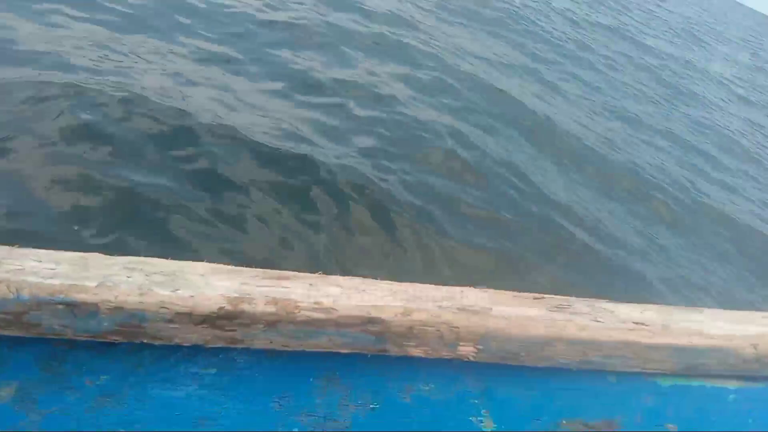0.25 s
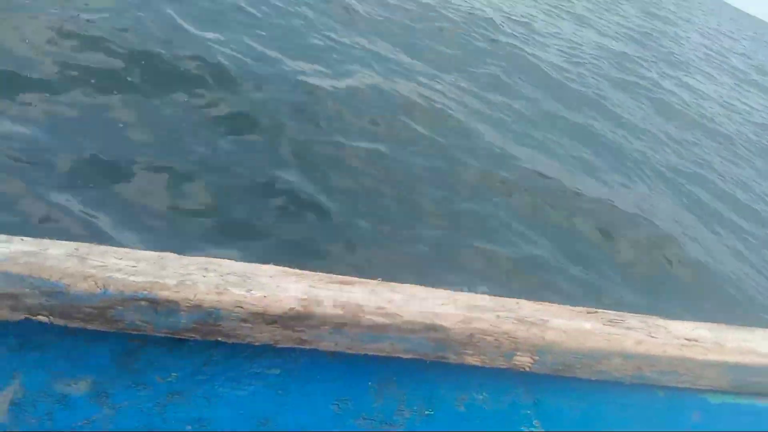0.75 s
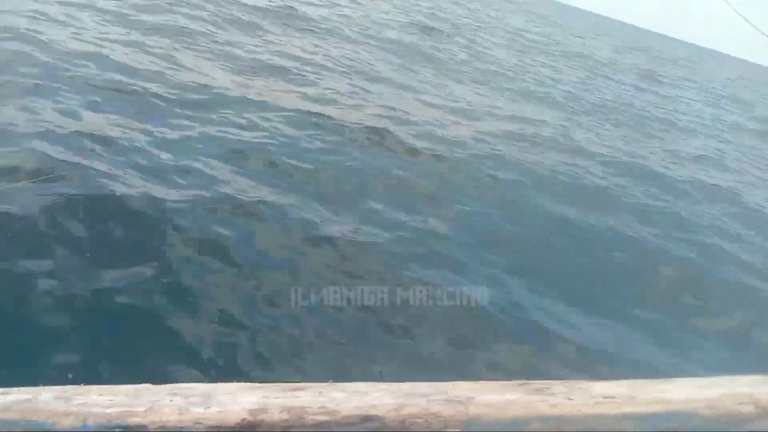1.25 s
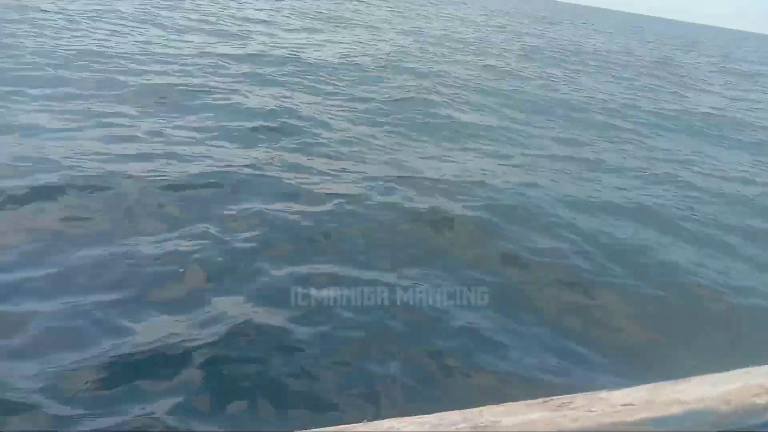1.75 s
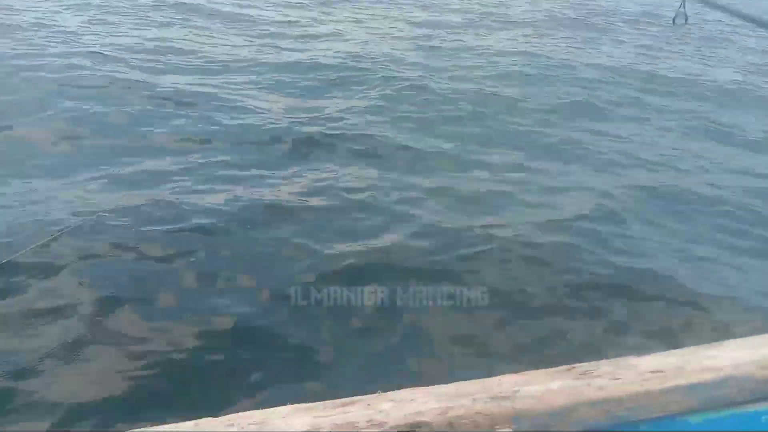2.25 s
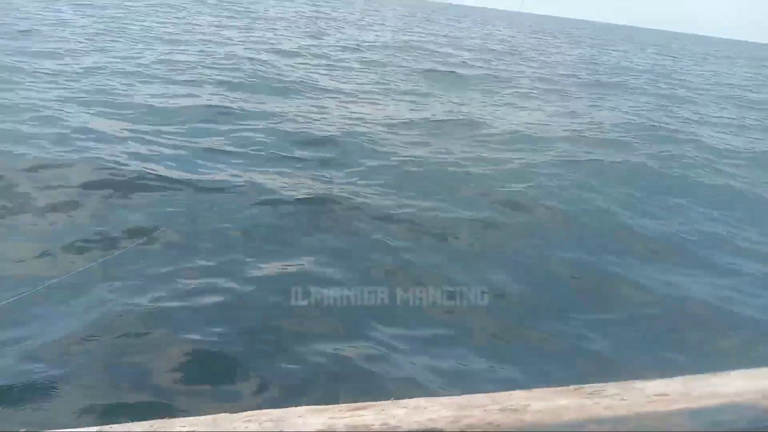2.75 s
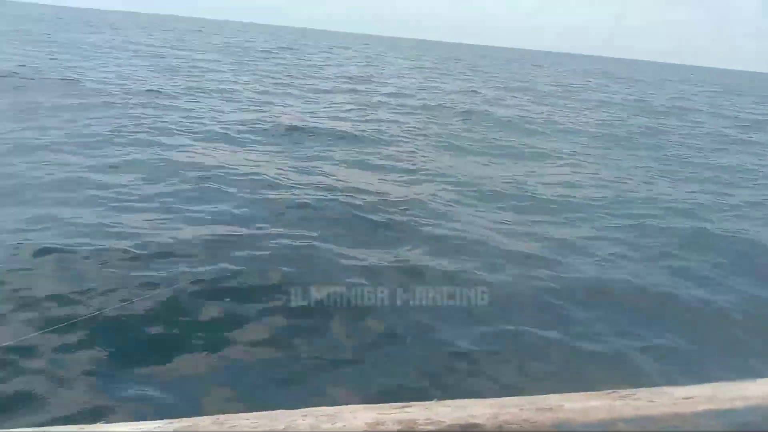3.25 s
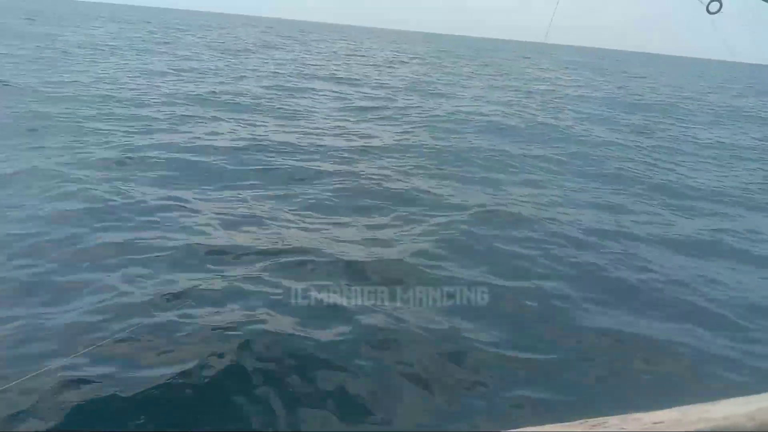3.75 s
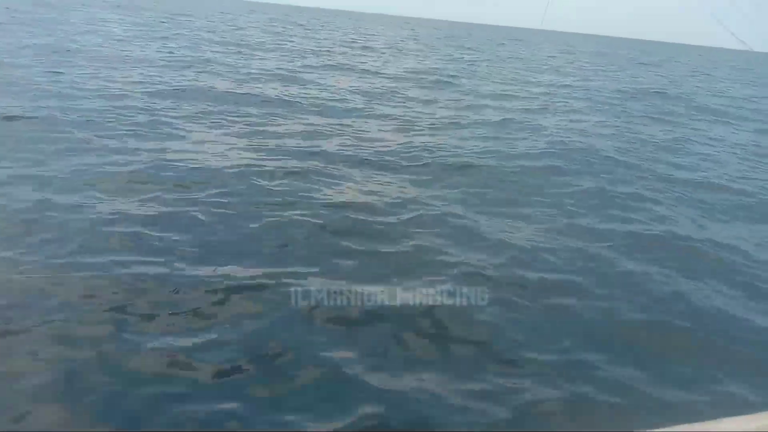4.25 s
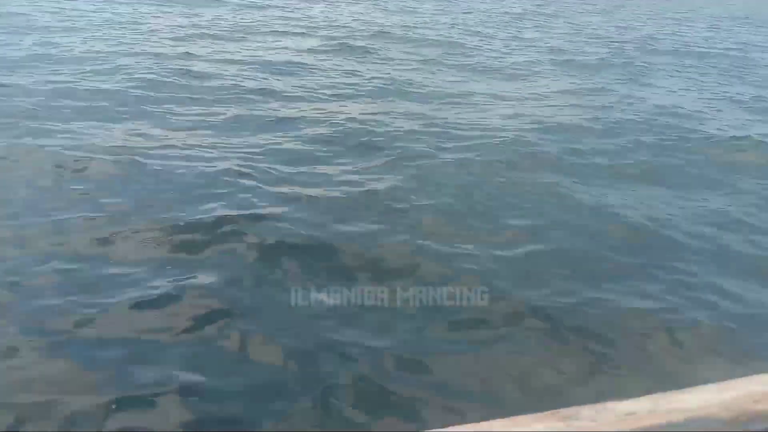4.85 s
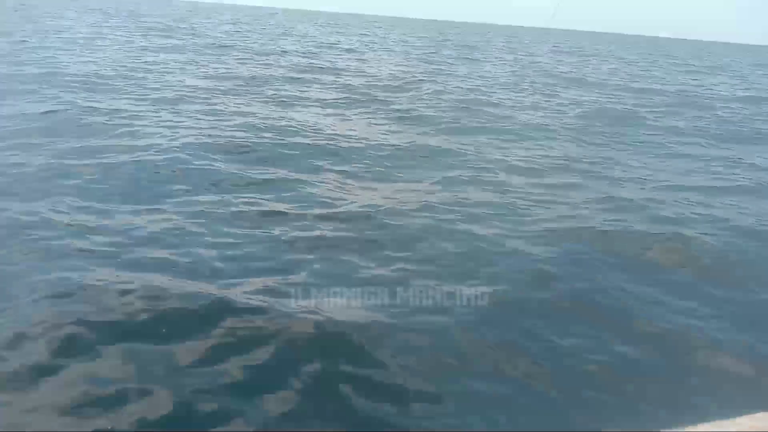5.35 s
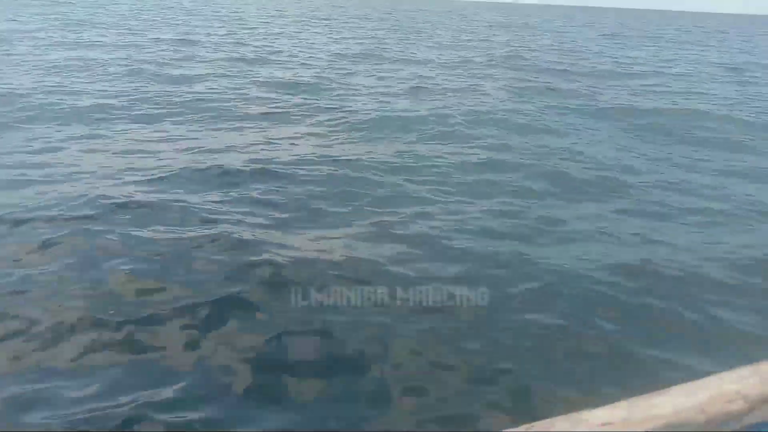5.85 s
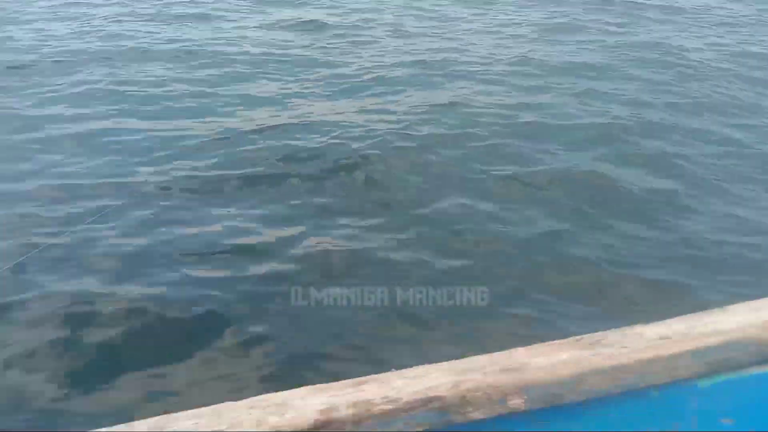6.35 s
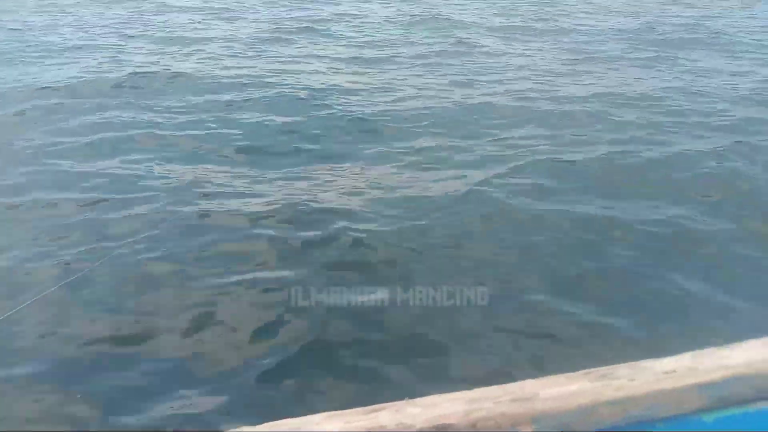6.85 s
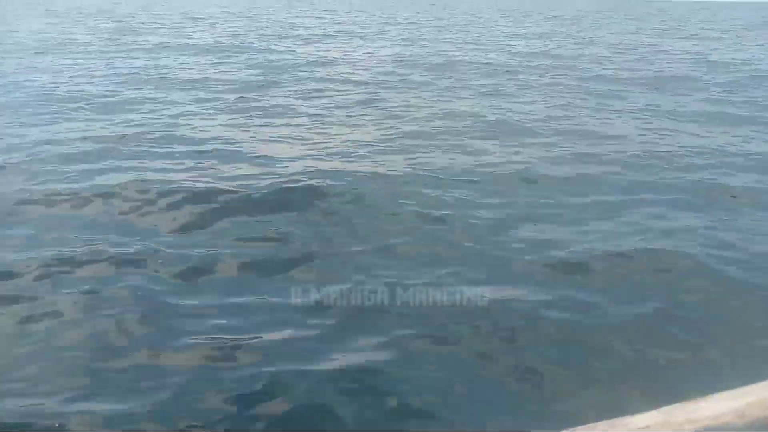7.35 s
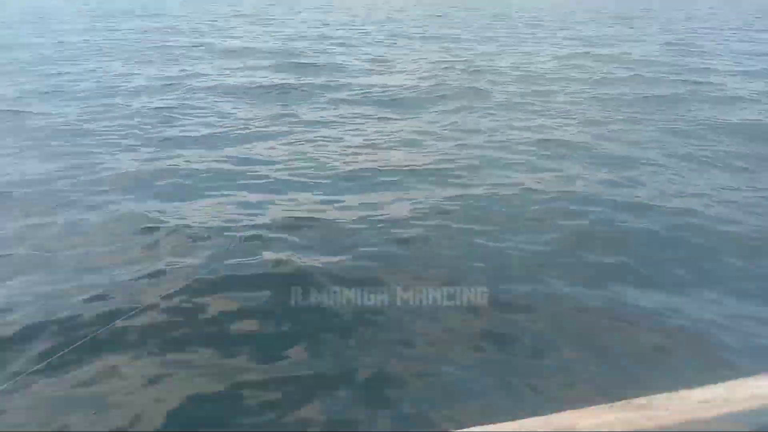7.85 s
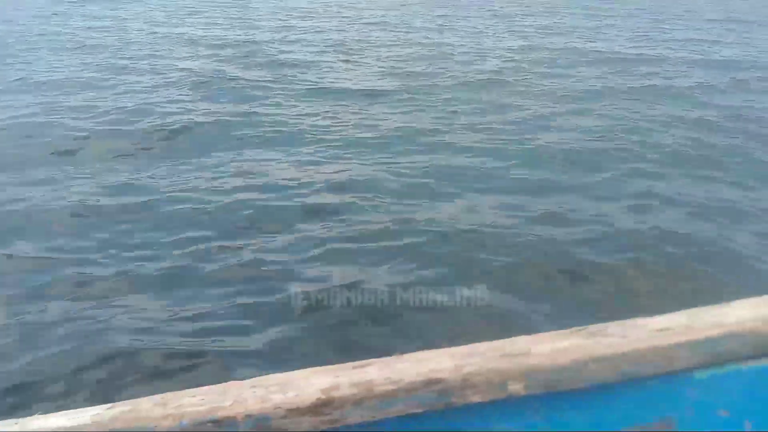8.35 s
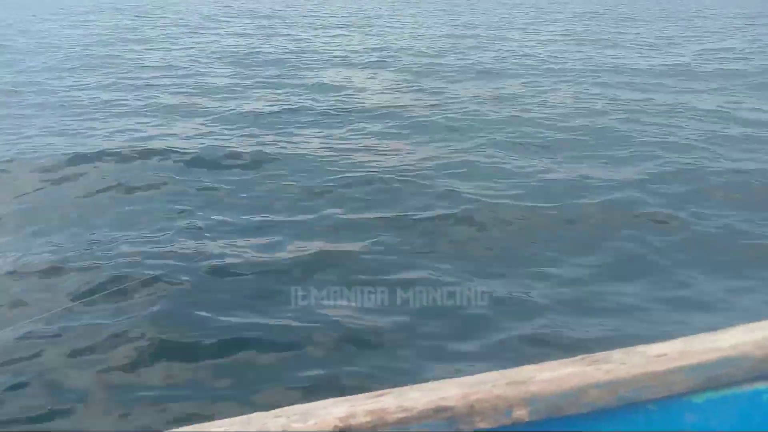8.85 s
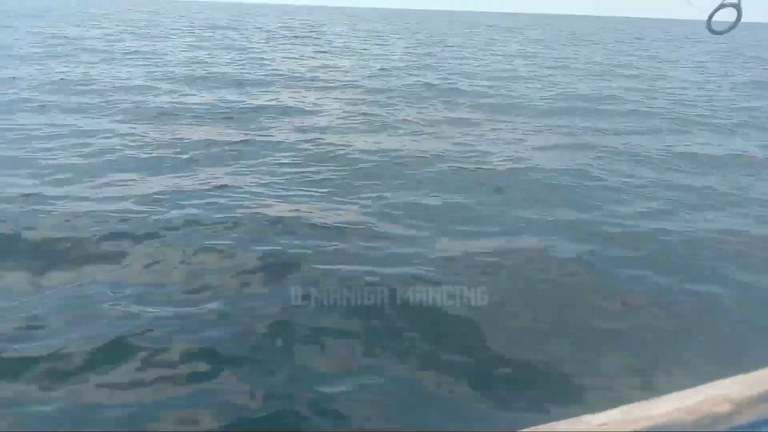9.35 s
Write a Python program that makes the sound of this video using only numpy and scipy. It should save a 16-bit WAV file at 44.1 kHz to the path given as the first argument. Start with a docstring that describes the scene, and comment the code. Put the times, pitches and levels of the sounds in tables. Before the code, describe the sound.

Light swell works against a wooden hull. Breeze hisses in uneven puffs through hollow microphone resonances, with soft low buffets and fine droplet crackle. Deep air-pocket glugs and booming wavelets are busiest in the first two seconds, followed by a brief bright splash. Then scattered wet plank slaps, gurgles and dry clicks of loose gear continue, the strongest wet slaps around six and a half seconds. Open air, close and dry.

```python
"""A small wooden boat lies on a light swell in open water. From the start a breeze hisses through the
resonances of the microphone housing and buffets it, spray crackles, and wavelets gurgle along the side.
Trapped pockets of air soon glug, water slaps the planks and loose gear ticks against the boat. After about
two seconds a short splash patters down; then glugs, slaps and ticks go on, scattered, over the water
and the breeze. Noise, clicks through resonances and fading tones make all of these sounds."""
import sys
import numpy as np
from scipy import signal
from scipy.fft import rfft, irfft, next_fast_len
from scipy.io import wavfile

SR = 44100
rng = np.random.default_rng(int(sys.argv[2]) if len(sys.argv) > 2 else 0)


def transcribe(u):
    """Save the signal u as a 16-bit wav file named by the first command-line argument.

    u: samples, shape (n,) or (channels, n), limited to [-1, 1]; the rate is SR.
    q: integer samples, one column per channel.
    """
    v = np.clip(np.atleast_2d(u).T, -1, 1)
    q = np.round(v * 32767).astype(np.int16)
    wavfile.write(sys.argv[1], SR, q)


N = 424241
TIME = np.arange(N) / SR   # seconds


def from_db(db):
    """Turn decibels into a gain."""
    return 10 ** (np.asarray(db) / 20)


def rms_one(x):
    """Scale a sound to unit power."""
    return x / np.sqrt(np.mean(x ** 2) + 1e-20)


def add(out, start, sound, peak_db):
    """Mix a sound in at a time in seconds, with the given peak."""
    at = max(0, round(start * SR))
    scaled = from_db(peak_db) * sound / np.abs(sound).max()
    out[at:at + len(sound)] += scaled[:N - at]


def drift(rate):
    """Smooth random wandering with a spread of 1; a higher rate wanders faster."""
    # worked out at every 20th sample, then joined by straight lines
    r = np.exp(-40 * np.pi * rate / SR)
    noise = rng.standard_normal(N // 20 + 2002)
    slow = signal.lfilter([1], [1, -2 * r, r * r], noise)[2000:]
    return np.interp(np.arange(N) / 20, np.arange(len(slow)), rms_one(slow))


def cut(x, hz, kind, order=2):
    """Butterworth filter: keep what lies below ("low") or above ("high") a frequency."""
    safe_hz = np.clip(hz, 10, .45 * SR)
    return signal.sosfilt(signal.butter(order, safe_hz, kind, fs=SR, output="sos"), x)


def resonate(x, hz, width):
    """Pass a sound through one resonance, with unit gain at its top."""
    r = np.exp(-np.pi * width / SR)
    feed = np.array([1, 0, -1]) * (1 - r * r) / 2
    return signal.lfilter(feed, [1, -2 * r * np.cos(2 * np.pi * hz / SR), r * r], x + 1e-18)


def colour(x, points):
    """Give a steady sound a spectrum, at unit power."""
    size = next_fast_len(N)
    hz, db = np.transpose(points)
    log_hz = np.log(np.arange(size // 2 + 1) * SR / size + 1)
    gain = from_db(np.interp(log_hz, np.log(hz), db))
    return rms_one(irfft(rfft(x, size) * gain, size)[:N])


def grains(per_s, spread_db):
    """Clicks at random moments, many small and a few large."""
    sizes = from_db(spread_db * np.minimum(rng.exponential(1, N), 4))
    return sizes * rng.choice([-1, 1], N) * (rng.random(N) < per_s / SR)


def swells(rows, rise_s, fall_s):
    """Gain that rises, holds and dies away for each (start, hold, level) row; the powers add."""
    # rise_s and fall_s are the times for a change of 20 dB
    t = TIME[::40]
    power = 0
    for start, hold, db in rows:
        before = np.maximum(start - t, 0) / rise_s
        after = np.maximum(t - start - hold, 0) / fall_s
        power = power + from_db(db - 20 * (before + after)) ** 2
    return np.interp(TIME, t, np.sqrt(power))


def far_sea():
    """The even, dull wash of the open water: noise kept between two filters."""
    dull = cut(rng.standard_normal(N), 1800, "low")
    return from_db(-88) * rms_one(cut(dull, 500, "high"))


# strength of the steady breeze, before each layer's own gain: (time [s], level [dB])
WIND_STRENGTH = [(0.0, -58.5), (0.45, -65), (0.8, -60), (1.1, -65), (1.4, -58), (1.97, -67.5),
                 (2.08, -82.5), (2.85, -73), (3.15, -65.5), (4.0, -68), (4.42, -71), (5.1, -71),
                 (5.55, -60.5), (6.25, -72), (6.6, -63), (7.6, -66.5), (7.85, -72), (8.5, -69.5),
                 (9.62, -75)]


def wind():
    """Gain of the steady breeze, which drives the hiss, the spray and a faint rumble."""
    return from_db(np.interp(TIME, *np.transpose(WIND_STRENGTH)))


# resonances of the microphone housing: (pitch [Hz], width [Hz], level [dB])
HOUSING_MODES = [(809, 49, -15.5), (1254.8, 26.1, 2.5), (1658, 150, -13.5), (1885, 200, -19.5),
                 (2572, 59, -4), (3010, 84, -8.5), (3296, 68, -8), (3824, 95, -16), (4264, 97, -19),
                 (4710, 170, -26), (5267, 42, -14), (5330, 310, -20), (5300, 65, -37), (6720, 82, -27),
                 (7120, 270, -23.5), (8730, 59, -25)]


def housing(x, flicker_db):
    """Hollow resonances, each swelling and fading as the flow shifts."""
    total = 0
    for k, (hz, width, db) in enumerate(HOUSING_MODES):
        strength = from_db(db + flicker_db * drift(15.4))
        total = total + (-1) ** k * resonate(x, hz, width) * strength
    return rms_one(total)


# puffs that lift the hiss and throw droplets, before each layer's own gain:
# (start [s], hold [s], hiss level [dB], spray level [dB])
WIND_PUFFS = [(0.034, 0.11, -75, -68), (0.626, 0.049, -60, -76), (0.804, 0.092, -67, -66),
              (1.24, 0.083, -57, -78), (1.33, 0.1, -52.5, -72), (1.837, 0.03, -67, -61.5),
              (2.338, 0.29, -58.5, -71), (3.196, 0.09, -64, -68), (3.51, 0.14, -59, -68.5),
              (3.727, 0.024, -65, -79), (4.512, 0.092, -63, -75), (4.903, 0.017, -54, -66.5),
              (5.44, 0.059, -59.5, -90), (5.61, 0.07, -61.5, -76), (5.96, 0.15, -62, -77),
              (6.398, 0.19, -61, -70.5), (6.867, 0.083, -59.5, -76), (6.988, 0.091, -61.5, -89),
              (7.416, 0.057, -65, -70), (7.5, 0.23, -65, -88), (8.132, 0.045, -64.5, -71),
              (8.28, 0.048, -59, -70), (8.932, 0.14, -63, -70), (9.168, 0.027, -58.5, -66.5)]
PUFF_RISE_S, PUFF_FALL_S = 0.068, 0.1   # time to swell or fade by 20 dB


def breeze_hiss():
    """A grainy rush of air makes the housing resonances hiss."""
    rows = [(start, hold, hiss_db) for start, hold, hiss_db, _ in WIND_PUFFS]
    level = np.hypot(wind(), swells(rows, PUFF_RISE_S, PUFF_FALL_S))
    return from_db(-0.94) * level * housing(grains(12000, spread_db=2.5), flicker_db=5.0)


# eddies that buffet the microphone, before the layer's gain: (start [s], hold [s], level [dB])
WIND_EDDIES = [(0.07, 0.067, -34.5), (0.14, 0.23, -45.5), (0.53, 0.036, -47), (1.15, 0.48, -73.5),
               (1.61, 0.12, -49), (1.85, 0.024, -52), (2.06, 0.26, -67), (2.25, 0.04, -56.5),
               (2.42, 0.2, -67), (3.0, 0.027, -67), (3.33, 0.026, -62), (3.49, 0.11, -57),
               (3.84, 0.01, -70), (4.55, 0.11, -73), (4.75, 0.018, -57.5), (4.87, 0.073, -63.5),
               (5.64, 0.036, -71), (6.49, 0.061, -54.5), (6.66, 0.023, -57.5), (7.05, 0.074, -60),
               (7.39, 0.068, -57.5), (7.54, 0.14, -63), (8.755, 0.0057, -58.5), (8.835, 0.011, -59.5),
               (8.96, 0.028, -60), (9.18, 0.046, -71)]
# spectrum of the buffeting: (frequency [Hz], level [dB per Hz])
BUFFET_SPECTRUM = [(20, -20.5), (40, -27), (60, 1), (105, 0.5), (160, -8), (240, -21), (400, -31.5),
                   (800, -64.5)]


def breeze_buffeting(rumble_db=-16.5):
    """Eddies push on the microphone in low lumps of noise, over a faint steady rumble."""
    # the rumble level is relative to the breeze
    level = np.hypot(from_db(rumble_db) * wind(), swells(WIND_EDDIES, rise_s=0.014, fall_s=0.063))
    low_noise = cut(colour(rng.standard_normal(N), BUFFET_SPECTRUM), 700, "low")
    return from_db(2.0) * level * low_noise


def droplets(per_s, spread_db, width_hz, count=28):
    """Tiny bubbles burst, each ringing briefly at one of many pitches."""
    pitches = np.linspace(1500, 15300, count)
    return sum(resonate(grains(per_s / count, spread_db), hz, width_hz) for hz in pitches)


# spectrum of the spray: (frequency [Hz], level [dB per Hz])
SPRAY_SPECTRUM = [(700, -14.5), (1800, -2), (4000, -2.5), (6000, 1), (6400, -12.5), (7200, 0.5),
                  (8000, -16.5), (9000, -8.5), (11000, -4), (13800, -15), (15200, -5.5)]


def spray(steady_db=-11):
    """Droplets crackle in quick flurries over a faint even fizz."""
    rows = [(start, hold, spray_db) for start, hold, _, spray_db in WIND_PUFFS]
    thrown = swells(rows, PUFF_RISE_S, PUFF_FALL_S)
    level = np.hypot(from_db(steady_db) * wind(), thrown)   # steady_db is relative to the breeze
    flurries = from_db(5.55 * drift(30))
    crackle = rms_one(droplets(4500, spread_db=2.5, width_hz=1094)) * flurries
    fizz = from_db(-10) * rng.standard_normal(N)
    return from_db(-3.0) * level * colour(crackle + fizz, SPRAY_SPECTRUM)


# waves that work along the hull, before each layer's own gain: (start [s], hold [s], level [dB])
HULL_WAVES = [(0.12, 0.44, -64.5), (0.54, 0.13, -54), (1.2, 0.21, -65), (1.72, 0.26, -66.5),
              (2.35, 0.27, -62.5), (3.2, 0.13, -66), (3.5, 0.14, -76), (4.88, 0.1, -75),
              (5.34, 0.48, -72.5), (6.38, 0.12, -59), (6.62, 0.066, -67), (6.92, 0.066, -76),
              (7.42, 0.17, -81), (7.93, 0.15, -72.5), (8.29, 0.043, -68.5), (9.12, 0.18, -72),
              (9.42, 0.033, -72.5)]


def lap_level(calm_db=-83.5):
    """Gain of the water working along the hull; calm_db remains between waves."""
    return np.hypot(from_db(calm_db), swells(HULL_WAVES, rise_s=0.15, fall_s=0.1))


# wavelets rolling along the side: (start [s], end [s], level [dB], bubble pitch [Hz])
WAVELETS = [(0.628, 0.693, -48.5, 302), (0.794, 0.81, -51, 400), (0.891, 0.921, -57, 300),
            (1.123, 1.249, -53.5, 331), (1.28, 1.404, -54, 545), (1.497, 1.509, -50, 296),
            (1.814, 1.88, -54.5, 300), (4.507, 4.641, -53.5, 326), (5.437, 5.455, -51, 550),
            (5.631, 5.685, -44.5, 400), (6.363, 6.48, -62.5, 272), (7.906, 7.987, -69.5, 302),
            (8.902, 8.949, -54, 554), (9.111, 9.154, -53.5, 447)]
# resonances of the hollow under the side of the boat: (pitch [Hz], width [Hz], level [dB])
HOLLOW_MODES = [(164, 21, -3.5), (270, 22, -1), (443.3, 33, 3)]


def lapping(edge_s=0.016, fall_db=11.5, open_db=-8, top_hz=620, sharpness=17.2):
    """Crowds of large bubbles gurgle along the hull; each passing wavelet makes the hollow boom."""
    pitches = np.geomspace(140, 900, 16)
    bubbles = np.array([rms_one(resonate(grains(110, spread_db=5.5), hz, hz / sharpness))
                        for hz in pitches])
    gurgle = from_db(-5.5 * np.log2(pitches / 420) ** 2) @ bubbles
    out = from_db(-1.0) * lap_level() * rms_one(cut(gurgle, 1100, "low", order=4))
    for start, end, db, centre_hz in WAVELETS:
        here = slice(round((start - .05) * SR), round((end + .05) * SR))
        # bubbles one octave from the centre pitch are weaker by fall_db
        crowd = from_db(-fall_db * np.log2(pitches / centre_hz) ** 2) @ bubbles[:, here]
        boom = from_db(open_db) * crowd   # the part heard directly
        for hz, width, mode_db in HOLLOW_MODES:
            boom = boom + from_db(mode_db) * resonate(crowd, hz, width)
        corners = [start - edge_s, start + edge_s, end - edge_s, end + 2 * edge_s]
        swell = np.interp(TIME[here], corners, [0, 1, 1, 0])
        out[here] += from_db(db) * swell * rms_one(cut(boom, top_hz, "low", order=6))
    return out


def froth(centre_hz=1340, fall_db=5, sharpness=28.0):
    """Smaller bubbles burst in the froth of each wave, higher in pitch than its gurgle."""
    bubbles = 0
    for hz in np.geomspace(700, 2300, 12):
        gain = from_db(-fall_db * np.log2(hz / centre_hz) ** 2)   # fall_db is lost one octave away
        bubbles = bubbles + gain * resonate(grains(45, spread_db=3.0), hz, hz / sharpness)
    return from_db(-12.5) * lap_level() * rms_one(cut(bubbles, 600, "high"))


# air pockets squeezed under the hull:
# (time [s], peak level [dB], first pitch [Hz], last pitch [Hz], swell time [s])
AIR_POCKETS = [(0.0811, -16.5, 373, 120, 0.0073), (0.158, -27, 140, 161, 0.0056),
               (0.519, -29.5, 145, 113, 0.0051), (0.672, -37, 320, 275, 0.0041),
               (1.355, -41.5, 466, 430, 0.0062), (1.515, -41.5, 119, 86, 0.012),
               (1.844, -43.5, 187, 137, 0.02), (3.508, -36, 126, 104.6, 0.0073),
               (4.525, -62, 505, 292, 0.0069), (4.611, -45.5, 192, 162, 0.013),
               (5.454, -33.5, 130, 129, 0.024), (8.898, -39.5, 558, 526, 0.0061),
               (8.929, -42.5, 540, 470, 0.0039), (9.102, -47, 494, 442, 0.0063),
               (9.118, -39.5, 238, 217, 0.027), (9.285, -56, 450, 400, 0.013)]


def glugs(rough=0.18, waver=0.048, sharpness=1.6, glide=1.1):
    """A trapped pocket swells and rings; its pitch slides, nearly always down, as water closes over it."""
    out, t = np.zeros(N), TIME[:SR // 4]
    wobble, churn = drift(61), drift(120)
    for start, db, first_hz, last_hz, swell_s in AIR_POCKETS:
        here = slice(round(start * SR), round(start * SR) + len(t))
        age = t / swell_s   # glide is counted in swell times too
        slide = np.exp(-(age / glide) ** 2)
        hz = (last_hz + (first_hz - last_hz) * slide) * (1 + waver * wobble[here])
        envelope = (age * np.exp(1 - age)) ** sharpness * (1 + rough * churn[here])
        add(out, start, envelope * np.sin(2 * np.pi * np.cumsum(hz) / SR), db)
    return out


# ringing modes of the planks; damping shortens the fade:
# (pitch [Hz], level [dB], time to fade by 60 dB before damping [s])
PLANK_MODES = [(98, -7, 0.13), (302, -8, 0.13), (400, -8.5, 0.13), (716, -8, 0.066), (891, -11.5, 0.15),
               (971, -23, 0.18), (1090, -23, 0.14), (1269, -6.5, 0.11), (1531, -5, 0.02),
               (1973, -2.5, 0.013), (2302, -12, 0.097), (3090, -13.5, 0.027), (4120, -5, 0.013)]
# slaps on the planks; the crack level is taken before the final mix:
# (time [s], peak level [dB], pitch of the smack [Hz], top edge [Hz], wet crack level [dB])
WATER_SLAPS = [(0.3536, -43, 3340, 4400, -1), (0.369, -43, 1400, 2240, -26),
               (0.5135, -26.5, 1690, 4330, -4.5), (2.353, -30, 2230, 12000, 7.5),
               (2.481, -39.5, 1340, 4000, -22), (3.481, -51.5, 2640, 6000, -3),
               (4.905, -52, 745, 1510, -22), (5.4197, -41, 1110, 3020, -6), (5.45, -31.5, 730, 2520, 4),
               (6.486, -30, 4300, 11600, 13.5), (6.4893, -32, 1380, 7140, 2.5), (6.529, -35, 1950, 6100, 4),
               (6.535, -32.5, 1640, 6300, 10.5), (6.6368, -30, 1400, 1800, -8),
               (9.166, -44.5, 1500, 4500, -11)]


def slaps(travel_s=0.0014, patter_s=0.0051, patter=0.12, crack_s=0.062, detune=0.03,
          smack=0.675, wet_damping=0.72, pop=1.45, pop_cycles=2.1):
    """A sheet of water hits the planks; bending waves bring the treble first and the bass later."""
    out, t = np.zeros(N), TIME[:SR // 4]
    for start, db, smack_hz, top_hz, crack_db in WATER_SLAPS:
        body = 0
        damping = 0.67 + wet_damping * from_db(crack_db)   # a wetter blow deadens the planks
        chances = rng.standard_normal((len(PLANK_MODES), 2))
        for (hz, mode_db, fade_s), (strength, load) in zip(PLANK_MODES, chances):
            age = np.maximum(t - travel_s * (np.sqrt(4500 / hz) - 1), 0)
            envelope = from_db(mode_db + 1.27 * strength - 60 * damping * age / fade_s)
            # the water pressing on the planks shifts their modes a little at every blow
            body = body + envelope * np.sin(2 * np.pi * hz * (1 + detune * load) * age)
        # one sharp push, then a noisy patter that dies away
        push = (t == 0) + patter * rng.standard_normal(len(t)) * np.exp(-t / patter_s)
        knock = signal.fftconvolve(body, push)[:len(t)]
        # air caught between water and wood gives each smack its own pitch
        air = rms_one(resonate(knock, smack_hz, 0.12 * smack_hz))
        knock = knock + smack * knock.std() * air
        crack_fade = from_db(crack_db - 60 * damping * t / crack_s)
        crack = cut(rng.standard_normal(len(t)), 1150, "high") * crack_fade
        # the first contact pops at once, before the planks answer
        contact = pop * np.sin(2 * np.pi * smack_hz * t) * np.exp(-smack_hz * t / pop_cycles)
        blow = knock / np.abs(knock).max() + contact + .5 * crack
        add(out, start, cut(blow, top_hz, "low", order=4), db)
    return out


# gear ticking against the boat: (time [s], peak level [dB], centre pitch [Hz])
GEAR_TICKS = [(0.543, -45, 12200), (2.408, -33.5, 7500), (2.4339, -34, 5270), (3.2249, -44, 6200),
              (4.121, -47.5, 6680), (4.3084, -51.5, 6600), (4.5132, -40, 5280), (4.721, -54.5, 3830),
              (4.903, -31.5, 5070), (5.606, -28.5, 5070), (5.695, -39, 5540), (5.8712, -37, 5400),
              (5.963, -45.5, 5250), (6.3607, -41, 5600), (6.8823, -45, 7040), (6.8954, -32, 6100),
              (7.3906, -47.5, 6300), (8.294, -39.5, 5300), (8.3, -41.5, 5370), (8.6642, -47, 4720),
              (8.9957, -45.5, 9200), (9.4793, -48, 4850)]


def ticks(snap_s=0.00077, ring_s=0.0052, ring_db=-12, bounce_s=0.0017, bounce_db=-8,
          brush_s=0.0037, brush_db=-25):
    """Small hard contacts: noise bursts form a light brush, a snap, a quick rebound and a short ring."""
    out, t = np.zeros(N), TIME[:SR // 20] - .01   # the brush comes just before time zero
    for contact_s, db, hz in GEAR_TICKS:
        first, second, tail = rng.standard_normal((3, len(t)))
        snap = first * (t > 0) * np.exp(-np.abs(t) / snap_s)
        rebound_fade = (t > bounce_s) * np.exp(-np.abs(t - bounce_s) / snap_s)
        rebound = from_db(bounce_db) * second * rebound_fade
        ring_fade = from_db(ring_db) * np.exp(-t / ring_s)
        brush_rise = from_db(brush_db) * np.exp(t / brush_s)
        brush_and_ring = tail * np.where(t > 0, ring_fade, brush_rise)
        tick = resonate(snap + rebound + brush_and_ring, hz, 1.07 * hz)
        tick = cut(cut(tick, 3100, "high"), 1.21 * hz, "low")
        add(out, contact_s + t[0], tick, db)
    return out


# surges of the splash, before each part's own gain: (start [s], hold [s], level [dB])
SPLASH_SURGES = [(2.315, 0.057, -37), (2.392, 0.058, -38), (2.476, 0.02, -38.5), (2.558, 0.06, -43.5)]
# spectrum of the spatter: (frequency [Hz], level [dB per Hz])
SPATTER_SPECTRUM = [(300, -20), (750, 17), (1020, -18), (1650, 7), (2200, -5.5), (4200, -6.5), (7200, -8.5),
                    (8200, -16.5), (12000, -13.5), (14000, -30), (15300, -13)]
# a thin squirt within the splash: (time [s], pitch [Hz])
SQUIRT_PITCH = [(2.317, 2600), (2.352, 3063), (2.378, 2450), (2.395, 3270), (2.43, 3270), (2.448, 2555),
                (2.5, 2960)]


def splash():
    """Thrown water patters down close by; a thin squirt wanders in pitch and the housing rings along."""
    level = swells(SPLASH_SURGES, rise_s=0.004, fall_s=0.033)
    spatter = colour(droplets(4000, spread_db=1.0, width_hz=620), SPATTER_SPECTRUM)
    spatter = from_db(-14) * cut(spatter, 230, "high")
    pitch = np.interp(TIME, *np.transpose(SQUIRT_PITCH))
    squirt = rms_one(drift(190) * np.sin(2 * np.pi * np.cumsum(pitch) / SR))
    # the squirt stands out most while the flow is at its strongest
    squirt = from_db(-11.5) * squirt * level / level.max()
    ringing = from_db(-14) * housing(grains(4000, spread_db=8.5), flicker_db=1.0)
    return level * (spatter + squirt + ringing)


def scene():
    """Open water: every layer is added dry, without echoes."""
    air = breeze_hiss() + breeze_buffeting() + spray()
    water = far_sea() + lapping() + froth() + glugs() + splash()
    return (air + water + slaps() + ticks())[None]


def record(dry):
    """The microphone loses the deepest bass; the top is cut steeply above 15600 Hz."""
    steep = signal.ellip(10, .1, 70, 15600, fs=SR, output="sos")
    return signal.sosfilt(steep, cut(dry, 28, "high"))


dry = scene()
out = record(dry)
transcribe(out)
```